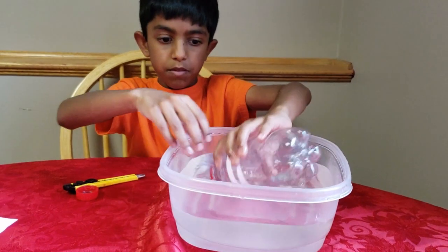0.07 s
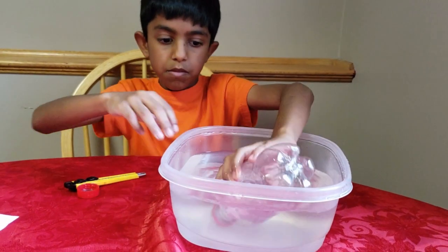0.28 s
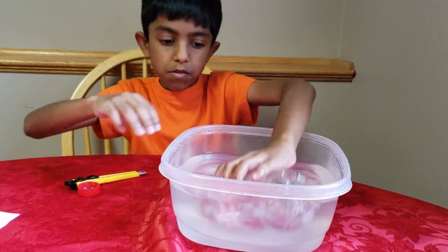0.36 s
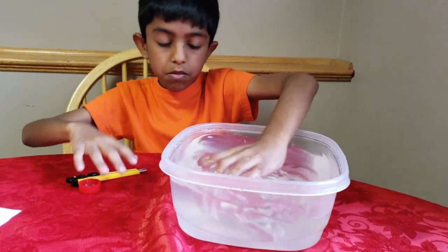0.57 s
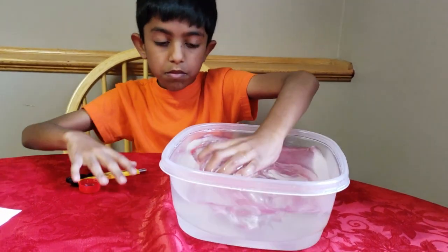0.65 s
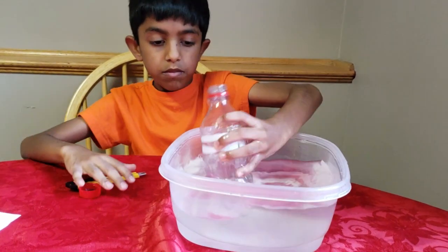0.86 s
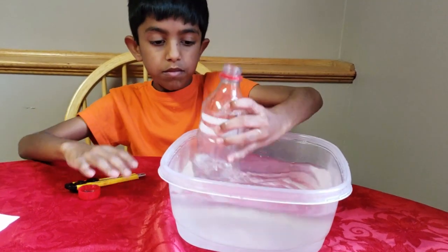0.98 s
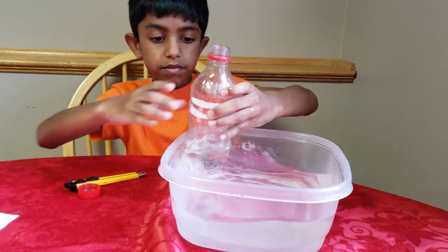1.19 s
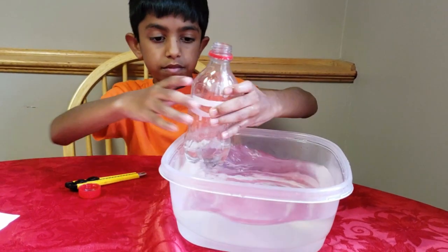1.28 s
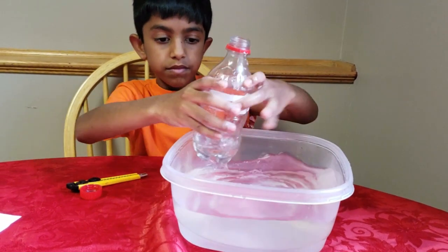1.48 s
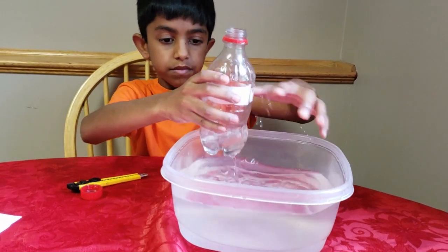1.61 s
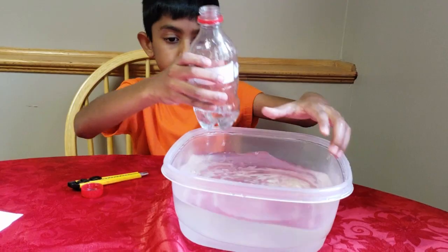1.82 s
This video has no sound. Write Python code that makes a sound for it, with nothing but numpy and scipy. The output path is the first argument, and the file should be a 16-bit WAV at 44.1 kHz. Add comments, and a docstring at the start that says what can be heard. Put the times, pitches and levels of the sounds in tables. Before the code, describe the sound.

Crisp plastic crackles and dull knocks burst out as a bottle is dunked in a plastic water tub, followed by short glugs, light splashes and a few last drips, heard close in stereo in a quiet indoor room.

```python
"""Sharp plastic snaps, hollow thuds and a low boom, then glugs, slaps of water and a few last drips.
A thin plastic bottle is pushed under the water in a plastic tub, then lifted out, in a small room.
Noise bursts with a resonance make the wall's snaps, its thuds and the slaps; decaying modes make the
tub's boom; wobbling, rising sines make the bubbles; tiny pings make the spray; shaped noise makes
the churning water and the room's background."""
import sys
import numpy as np
from scipy import signal
from scipy.fft import rfft, irfft
from scipy.io import wavfile

SR = 44100
rng = np.random.default_rng(int(sys.argv[2]) if len(sys.argv) > 2 else 0)


def store_pcm(level_fs):
    """Save levels as 16-bit WAV."""
    pcm = np.round(np.clip(level_fs, -1, 1) * 32767).astype(np.int16)
    wavfile.write(sys.argv[1], SR, np.atleast_2d(pcm).T)


N = 81585

# how alike the two microphones hear: (frequency [Hz], left-right correlation [-1 to 1])
LIKENESS = [(100, 0.97), (300, 0.93), (700, 0.46), (1500, 0.039), (3000, 0), (6000, 0), (15000, 0)]


def amp(db):
    """Decibels to gain."""
    return 10 ** (np.asarray(db) / 20)


def evened(x):
    """Scales to an rms of one."""
    return x / np.sqrt(np.mean(x ** 2) + 1e-20)


def read(points, hz):
    """Reads a curve on a log-frequency axis."""
    f, value = np.transpose(points)
    return np.interp(np.log(hz + 1), np.log(f + 1), value)


def level(points):
    """A dB curve over time as a gain for every sample."""
    return amp(np.interp(np.arange(N) / SR, *np.transpose(points)))


def add(mix, s, sound):
    """Mixes a sound in at a time in seconds."""
    part = mix[:, max(round(s * SR), 0):][:, :sound.shape[-1]]
    part += sound[..., :part.shape[1]]


def colour(x, db_at):
    """Filters by a dB function of frequency."""
    size = x.shape[-1]
    gain = amp(db_at(np.fft.rfftfreq(size, 1 / SR)))
    return irfft(rfft(x) * gain, size)


def paired(x):
    """Blends two unrelated signals into a microphone pair: alike in the bass, unrelated in the treble."""
    size = x.shape[-1]
    a, b = rfft(x)
    same = np.clip(read(LIKENESS, np.fft.rfftfreq(size, 1 / SR)), -1, 1)
    mid = a * np.sqrt((1 + same) / 2)
    side = b * np.sqrt((1 - same) / 2)
    return irfft(np.array([mid + side, mid - side]), size)


def noise(size):
    """White noise blended for the microphone pair."""
    return paired(rng.standard_normal((2, size)))


def rumble(spectrum):
    """Steady noise of a given colour, at an rms of one."""
    return evened(colour(noise(N), lambda f: read(spectrum, f)))


def burst(hz, octaves, decay_s, ring_share, size=8192):
    """One quickly dying resonance amid a dense cluster of weaker ones, drawn from noise around it."""
    rise_s = 0.0003
    t = np.arange(size) / SR
    shape = (1 - np.exp(-t / rise_s)) * np.exp(-t / decay_s)

    def cluster_db(f):
        distance = np.log2((f + 1) / hz) / octaves
        return -12 * (np.sqrt(1 + distance ** 2) - 1) - 2 * np.log2(1 + f / hz)

    cluster = colour(noise(size), cluster_db)
    # the ring's phase differs more between the microphones where they are less alike
    lag = rng.standard_normal((2, 1)) * (1 - read(LIKENESS, hz))
    ring = np.sin(2 * np.pi * hz * t + lag)
    share = np.clip(ring_share, 0, 1)  # of the power
    blend = np.sqrt(share) * evened(ring * shape) + np.sqrt(1 - share) * evened(cluster * shape)
    return evened(blend) * np.sqrt(np.mean(shape ** 2))


def ambience():
    """The room's quiet background: steady noise."""
    # its colour: (frequency [Hz], relative level [dB per Hz])
    background = [(15, -4.5), (35, -2), (54, 11), (85, -7), (135, 7), (170, -17.5), (215, -6), (320, -71),
                  (700, -76), (2000, -58), (6000, -24.5), (15000, -53)]
    return amp(-69) * rumble(background)


def churn():
    """The low churning of the water: coloured noise that swells and sinks."""
    # strength over time: (time [s], level [dB])
    churn_level = [(0, -75), (.31, -70), (.345, -62), (.46, -60.5), (.53, -43), (.65, -67), (.72, -49),
                   (.8, -56), (.9, -57), (.96, -57), (1.02, -73), (1.16, -71.5), (1.2, -64), (1.42, -74),
                   (1.53, -72), (1.61, -58.5), (1.7, -63), (1.85, -78.5)]
    # its colour: (frequency [Hz], relative level [dB per Hz])
    churn_colour = [(15, -42), (35, -17), (58, 10), (90, 1.5), (130, 8.5), (180, -5.5), (280, -7.5),
                    (450, -14.5), (750, -19), (1400, -43), (4000, -32)]
    return rumble(churn_colour) * level(churn_level)


def spray():
    """Stirred water sheds countless tiny drops, each a short ping of one of 36 pitches."""
    # stirring of the water: (time [s], level [dB])
    spray_level = [(0, -67.5), (.1, -80), (.175, -77), (.2, -59), (.3, -73), (.34, -61.5), (.4, -62.5),
                   (.46, -64.5), (.55, -64.5), (.63, -93), (.72, -70), (.81, -74.5), (.87, -55.5),
                   (.93, -64), (1.02, -65.5), (1.16, -77.5), (1.2, -62), (1.3, -71.5), (1.4, -73.5),
                   (1.85, -77.5)]
    # colour of the drops: (frequency [Hz], gain [dB])
    spray_colour = [(500, -10), (1000, -1), (2500, 5), (5500, 3.5), (8000, -1.5), (11000, 0.5), (16000, -2)]
    drops_per_s, spread_db, decay_cycles = 6400, 3.5, 3.3
    drops, t = np.zeros((2, N)), np.arange(1024) / SR
    pitches = np.geomspace(600, 15000, num=36)
    for hz in pitches:
        hit = rng.random((2, N)) < drops_per_s / len(pitches) / SR
        size = amp(spread_db * np.minimum(rng.exponential(1, (2, N)), 4))
        ping = np.sin(2 * np.pi * hz * t) * np.exp(-t * hz / decay_cycles) * hz
        drops += signal.oaconvolve(hit * size, ping[None], axes=1)[:, :N]
    return evened(colour(paired(drops), lambda f: read(spray_colour, f))) * level(spray_level)


def bubble(hz, decay, rise):
    """A trapped bubble rings briefly, its pitch wobbling and rising as it nears the surface."""
    onset_s, wobble_hz, wobble_per_rise = 0.0014, 160, 1.1
    t = np.arange(8192) / SR
    wobble = evened(colour(rng.standard_normal(len(t)), lambda f: -20 * np.log10(1 + (f / wobble_hz) ** 2)))
    # the climb stops after four decay times
    bend = rise * (np.minimum(t / decay, 4) + wobble_per_rise * wobble)
    turns = hz * np.cumsum(1 + bend) / SR
    return np.sin(2 * np.pi * turns) * (1 - np.exp(-t / onset_s)) * np.exp(-t / decay)


def glugs():
    """Single glugs and drips: one ringing bubble each."""
    # (time [s], pitch [Hz], level [dB], decay [s], rise of pitch [fraction per decay time])
    single_bubbles = [(.002, 2830, -62.5, 0.036, 0.017), (.2, 1180, -68.5, 0.052, 0.0028),
                      (0.287, 1182, -59.5, 0.026, 0.017), (0.827, 1085, -46, .008, .015),
                      (0.835, 5580, -53.5, 0.0082, 0.0025), (0.839, 1624, -49, 0.013, 0.0099),
                      (0.867, 3100, -51, 0.006, .0037), (0.921, 1497, -38.5, 0.0077, 0.0246),
                      (0.92, 2835, -49, 0.0098, 0.017), (.952, 1235, -35.5, 0.01, 0.017),
                      (0.952, 1647, -47, 0.025, 0.0085), (0.971, 1460, -40, 0.0029, 0.046),
                      (0.985, 1366, -37.5, 0.0044, 0.02), (.993, 5450, -46, 0.0047, 0.023),
                      (1.245, 1575, -33, 0.0024, 0.0073), (1.269, 1621, -56, 0.022, 0.016),
                      (1.277, 760, -48.5, 0.013, 0.028), (1.308, 967, -53.5, 0.015, 0.017),
                      (1.317, 807, -51, 0.0064, 0.015), (1.543, 9040, -54, 0.0031, 0.017),
                      (1.697, 4886, -45.5, 0.004, 0.03), (1.704, 4757, -49, 0.008, 0.015),
                      (1.7422, 10100, -46, 0.0012, 0.039)]
    out = np.zeros((2, N))
    for s, hz, db, decay, rise in single_bubbles:
        add(out, s, amp(db) * bubble(hz, decay, rise))
    return out


def snaps():
    """The thin wall buckles in sharp snaps, each trailed by three lesser creases."""
    # (time [s], level before the shell's colour [dB], centre [Hz], width [octaves])
    buckles = [(0.191, -45.5, 4500, 1.2), (0.1989, -35.5, 4000, 0.78), (.323, -35.5, 6270, 0.31),
               (.336, -26, 2210, 0.92), (0.343, -37, 3110, 0.62), (0.4143, -40.5, 8300, 0.16),
               (.416, -29, 2820, 0.83), (0.4809, -40, 5570, 1.2), (0.517, -32.5, 2260, 0.85),
               (0.5247, -33, 2550, 1.54), (.537, -36, 5120, 0.33), (0.558, -43, 3320, .58),
               (0.591, -32.5, 6600, 0.34), (0.593, -31.5, 5570, 0.72), (.602, -32, 6000, 1.3),
               (0.6063, -31, 2596, 0.57), (0.7392, -28.5, 1990, 1.23), (1.277, -36, 5570, 0.41),
               (1.281, -36, 2080, 1.9)]
    decay_s, ring_share = 0.0018, 0.16
    crease_span_s, crease_db = 0.024, -13
    out = np.zeros((2, N))
    for s, db, hz, octaves in buckles:
        add(out, s, amp(db) * burst(hz, octaves, decay_s, ring_share))
        for when, pitch in rng.random(size=(3, 2)):
            crease_hz = hz * 2 ** (.5 - 2 * pitch)
            crease = burst(crease_hz, octaves, decay_s, ring_share)
            add(out, s + crease_span_s * when, amp(db + crease_db) * crease)
    return out


def thuds():
    """Hollow thuds of the bottle in the water: lower, longer bursts."""
    # (time [s], level before the shell's colour [dB], centre [Hz])
    knocks = [(0.3224, -44.5, 335), (.336, -35.5, 523), (0.345, -32, 313), (0.417, -44.5, 660),
              (.513, -38.5, 702), (.52, -36, 210.6), (0.59, -40, 1157), (0.606, -31.5, 251.4),
              (0.636, -40, 322), (.677, -46.5, 290), (0.741, -39.5, 295), (0.75, -42, 813),
              (0.852, -43.5, 266), (0.891, -52, 290), (0.955, -48, 316), (1.185, -57.5, 398),
              (1.545, -67, 640)]
    out = np.zeros((2, N))
    for s, db, hz in knocks:
        add(out, s, amp(db) * burst(hz, octaves=0.91, decay_s=0.013, ring_share=0.27))
    return out


def bottle():
    """Snaps and thuds alike take on the colour of the bottle's shell."""
    # (frequency [Hz], gain [dB])
    shell = [(100, -7), (280, -1.5), (450, -8.5), (700, -1), (950, -6), (1150, 0.5), (1450, -5),
             (2500, 0.5), (3600, -2), (5500, 1.5), (7000, -1), (8000, -3.5), (15000, -4.5)]
    return colour(snaps() + thuds(), lambda f: read(shell, f))


def tub():
    """Each shove swells the low modes of the water-filled tub, which then die at their own speeds."""
    # shoves that set the tub and its water booming: (time [s], level [dB])
    shoves = [(0.33, -31), (0.552, -38.5), (0.585, -29.5), (0.742, -34), (0.828, -63), (1.185, -52.5),
              (1.59, -57)]
    # the tub's modes: (frequency [Hz], relative level [dB], rise [s], time to fall 60 dB [s])
    modes = [(54.6, -13, 0.0052, 0.35), (109.4, 2.5, 0.059, 0.2), (131, -3, 0.032, 0.61),
             (253.4, -22.5, 0.0069, 0.19), (298, -11.5, 0.028, 0.17)]
    out, t = np.zeros((2, N)), np.arange(SR) / SR
    boom = np.zeros(SR)
    for hz, db, rise, t60 in modes:
        swell = 1 - np.exp(-(t / rise) ** 2)
        boom += amp(db - 60 * t / t60) * swell * np.sin(2 * np.pi * hz * t)
    for s, db in shoves:
        add(out, s, amp(db) * boom)
    return out


def gurgles():
    """Swarms of 24 bubbles, spread over time, pitch and strength."""
    # (start [s], length [s], level of the strongest bubbles [dB], centre pitch [Hz])
    swarms = [(0.523, 0.049, -46.5, 795), (0.743, 0.077, -49.5, 929), (0.814, 0.12, -54.5, 982),
              (1.186, 0.091, -58, 907), (1.262, .075, -63.5, 1168), (1.54, 0.1, -79, 560)]
    pitch_octaves, spread_db, decay_cycles = 1.096, 12.5, 5.84
    out = np.zeros((2, N))
    for start, length, db, centre_hz in swarms:
        draws = rng.random(size=(24, 3))
        for k, (when, pitch, weakness) in enumerate(draws):
            hz = centre_hz * 2 ** (pitch_octaves * (pitch - .5))
            s = start + length * (k + when) / len(draws)
            add(out, s, amp(db - spread_db * weakness) * bubble(hz, decay_cycles / hz, rise=.04))
    return out


def slaps():
    """Water slaps the surface in short bursts."""
    # (time [s], level [dB], centre [Hz], width [octaves])
    splats = [(0.83, -41.5, 1420, 0.97), (.854, -46, 5950, 0.32), (0.865, -49, 7000, 0.23),
              (.993, -48, 5700, 0.25), (1.002, -46.5, 3780, 1.5), (1.037, -47.5, 5250, 0.19),
              (1.182, -48.5, 2020, 0.37), (1.244, -50.5, 690, 0.4), (1.255, -46, 2100, 3.9),
              (1.267, -42, 3900, 3.5), (1.544, -50.5, 9100, 0.47), (1.697, -46, 6120, 0.6),
              (1.7414, -51.5, 11800, 0.26)]
    out = np.zeros((2, N))
    for s, db, hz, octaves in splats:
        add(out, s, amp(db) * burst(hz, octaves, decay_s=0.0025, ring_share=0.16))
    return out


def room(x, wet_db):
    """Adds the small room: the nearest wall's echo and dense reflections, each band dying at its own speed."""
    # (frequency [Hz], time to fall 60 dB [s])
    band_t60 = [(150, 0.41), (600, 0.24), (1400, 0.34), (4000, 0.28), (8000, 0.28), (15000, 0.4)]
    delay_s = 0.00079
    wall_s, wall_smear_s, wall_db = .0098, 0.00033, -13.5
    size = SR // 2
    taps = rng.choice([-1., 1.], (2, size)) * (rng.random((2, size)) < 4000 / SR)  # 4000 per second
    hz, t, z = signal.stft(paired(taps), SR, nperseg=256)
    fade = amp(-60 * t / read(band_t60, hz)[:, None])
    tail = signal.istft(z * fade, SR, nperseg=256)[1]
    t = np.arange(tail.shape[1]) / SR
    tail = tail * np.clip(t / delay_s - 1, 0, 1)  # silent up to the delay, full at twice the delay
    wall = noise(len(t)) * (t > wall_s) * np.exp(-abs(t - wall_s) / wall_smear_s)
    echoes = amp(wet_db) * tail / np.linalg.norm(tail[0])
    echoes = echoes + amp(wall_db) * wall / np.linalg.norm(wall[0])
    return x + signal.fftconvolve(x, echoes, axes=1)[:, :N]


def scene():
    """Bottle, water and bubbles ring in the room; the low layers and background stay without its echoes."""
    low = ambience() + churn() + tub()
    struck = room(spray() + bottle() + slaps(), wet_db=-4.5)
    bubbling = room(glugs() + gurgles(), wet_db=-2.5)
    return low + struck + bubbling


def record(dry):
    """The microphones shed the deepest bass and the right one is brighter; then the band limit."""
    # (frequency [Hz], left minus right [dB])
    balance = [(100, -1), (300, -0.2), (1400, 0.5), (6000, 0.5), (9000, -2), (13000, -7)]
    low_cut_hz, edge_hz = 22, 16050

    def microphone_db(f):
        tilt = read(balance, f) * np.array([[.5], [-.5]])
        return tilt - 10 * np.log10(1 + (low_cut_hz / (f + 1)) ** 4)

    heard = colour(dry, microphone_db)
    band_limit = signal.firwin(511, edge_hz, window=("kaiser", 9), fs=SR)
    return signal.oaconvolve(heard, band_limit[None], "same")


dry = scene()
out = record(dry)
store_pcm(out)
```